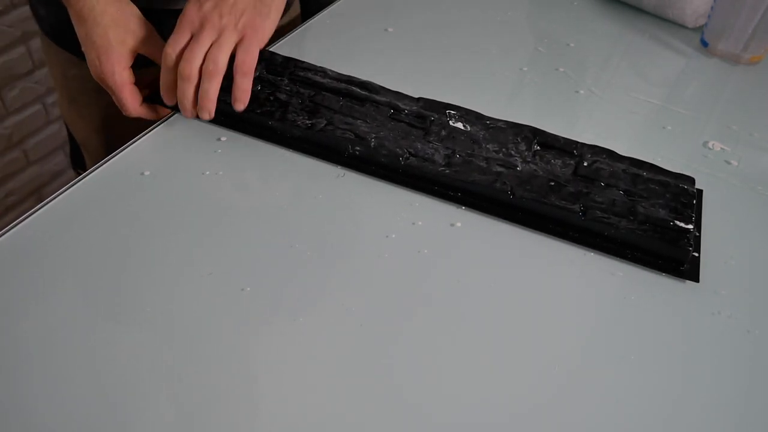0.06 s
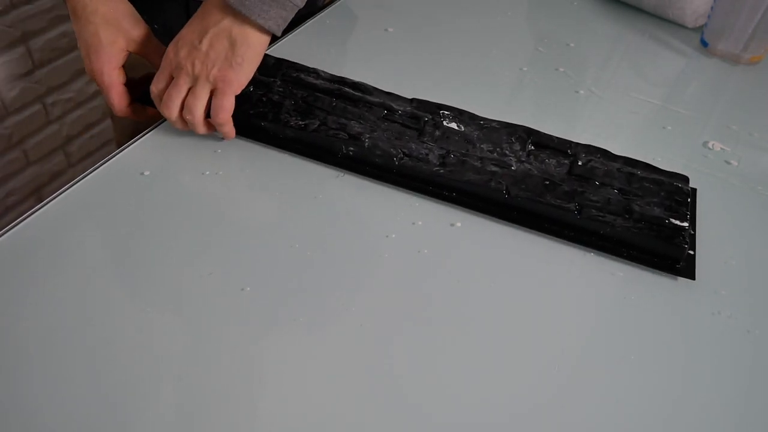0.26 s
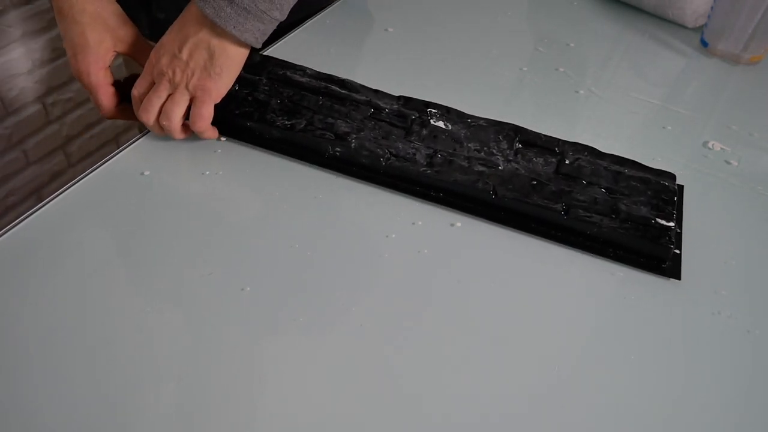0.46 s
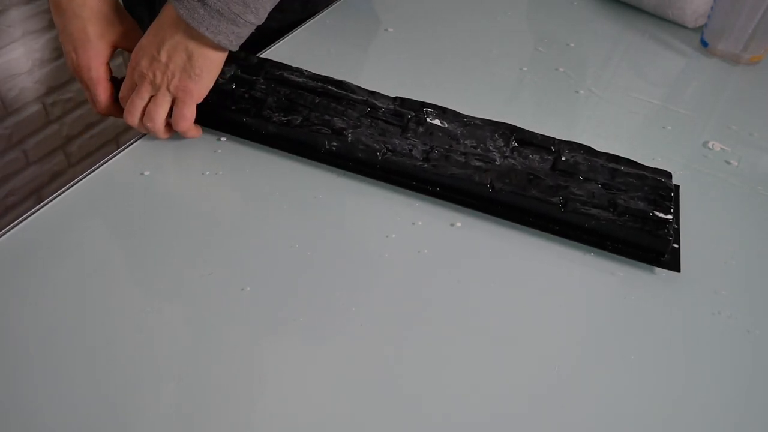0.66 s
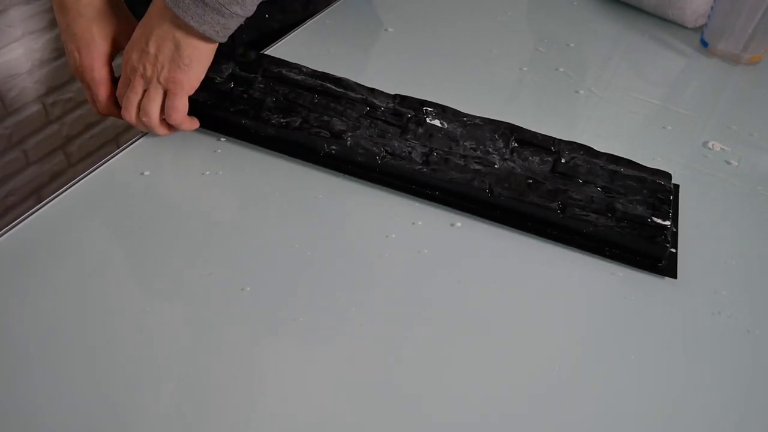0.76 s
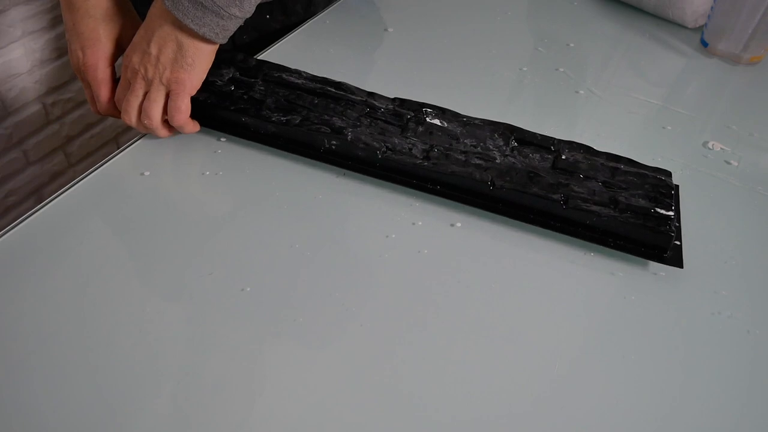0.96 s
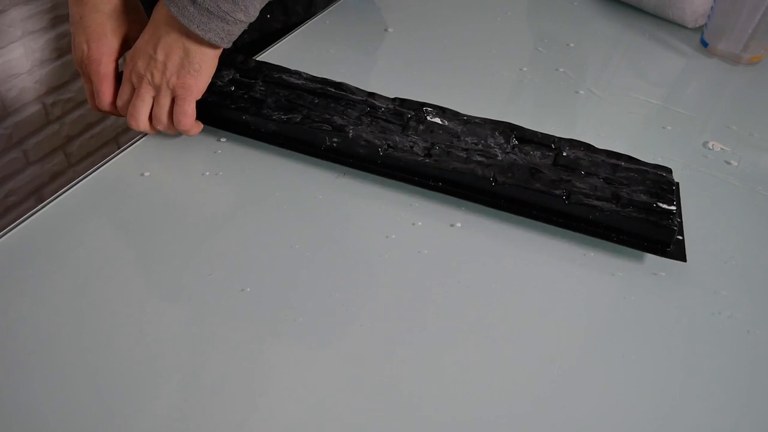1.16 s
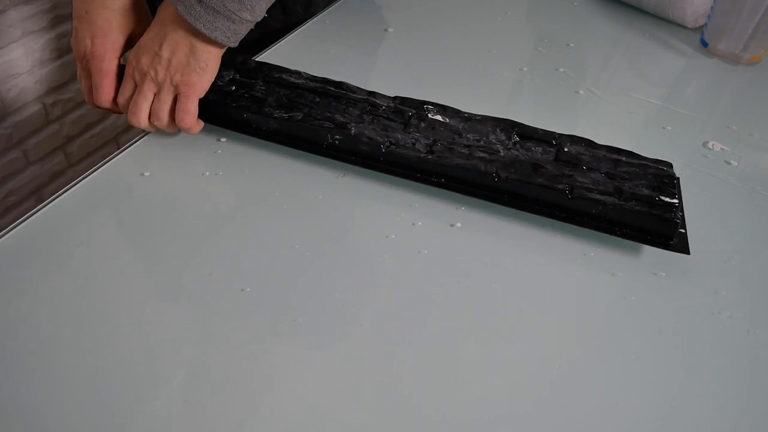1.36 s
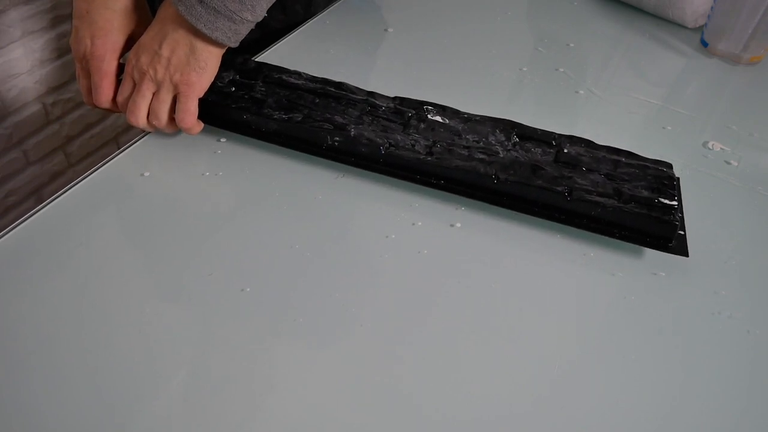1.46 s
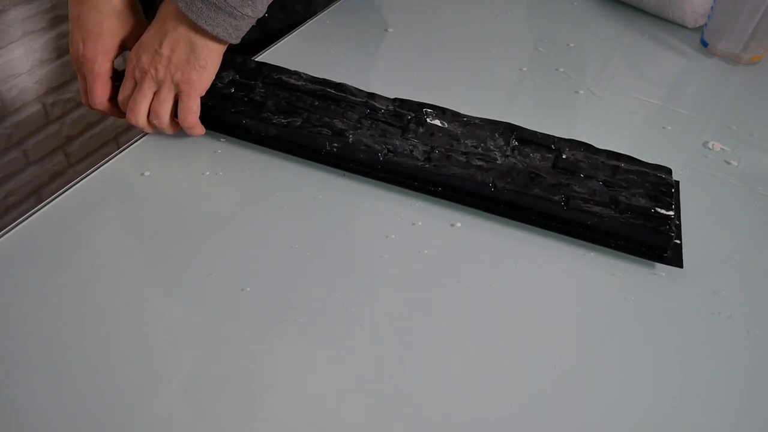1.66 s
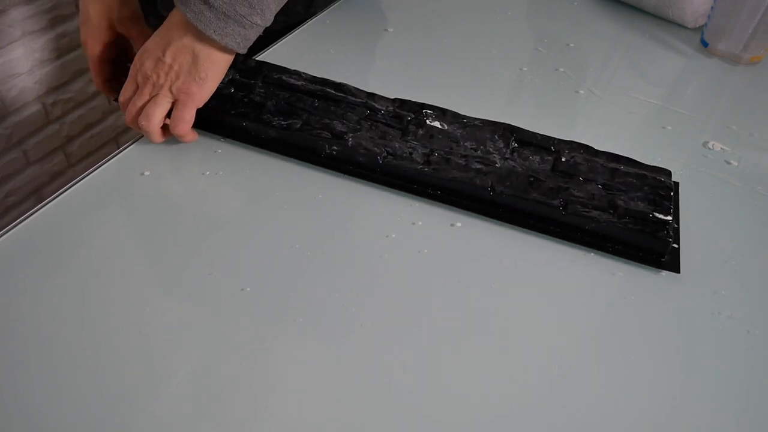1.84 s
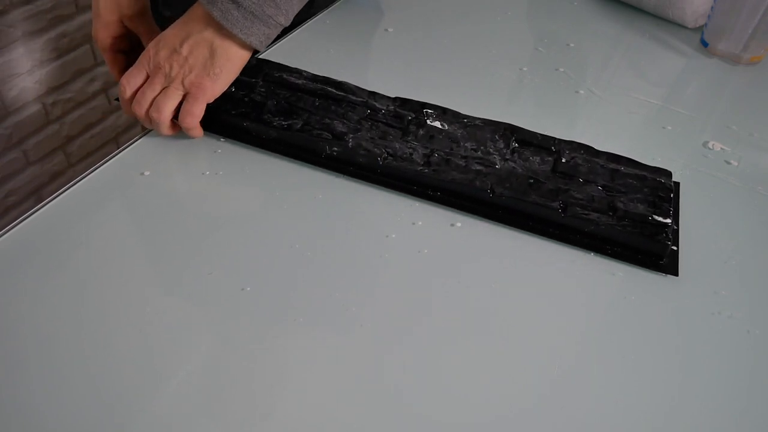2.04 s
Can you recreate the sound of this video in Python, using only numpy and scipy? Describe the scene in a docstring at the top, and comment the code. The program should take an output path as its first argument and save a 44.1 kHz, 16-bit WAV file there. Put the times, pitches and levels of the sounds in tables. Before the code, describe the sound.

Rubber mould bent by hand on a glass tabletop: a hard knock, scraping drags, dull popping thuds

```python
"""Rubber mould bent on a glass table

Hands bend a stiff rubber mould on a glass table in a small room. Fingers rub and swipe its ridged back
(coloured grainy noise); its end knocks (damped sines) and drags (random slips, bright noise) on the table
top, which rings low (decaying modes). Small pops, ticks and squeaks follow as the rubber flexes."""
import sys
import numpy as np
from scipy import signal
from scipy.fft import rfft, irfft, next_fast_len
from scipy.io import wavfile
from scipy.ndimage import uniform_filter1d, map_coordinates

SR = 44100
rng = np.random.default_rng(int(sys.argv[2]) if len(sys.argv) > 2 else 0)


def inscribe(sig):
    """Save sig as 16-bit PCM at rate SR to the path in sys.argv[1].

    A 1-D sig is mono; a 2-D sig holds one channel per row.
    Samples are clipped to [-1, 1] before scaling.
    """
    pcm = np.round(np.clip(np.atleast_2d(sig).T, -1, 1) * 32767)
    wavfile.write(sys.argv[1], SR, pcm.astype(np.int16))


def field_ratio(decibels):
    """Amplitude ratio for a level in dB (20 dB per decade); scalars and array-likes work."""
    return 10 ** (np.asarray(decibels, dtype=float) / 20)


N = 92610


def unit(x):
    """Scaled to rms 1."""
    return x / np.sqrt(np.mean(x ** 2) + 1e-20)


def along(points, hz):
    """(Hz, value) points read on a log frequency axis."""
    point_hz, values = np.transpose(points)
    return np.interp(np.log(hz + 1), np.log(point_hz + 1), values)


def curves(rows):
    """One value per sample for each column; the first, a level in dB, is silenced outside the table."""
    knot_s, level_db, *others = np.transpose(rows)
    t = np.arange(N) / SR
    inside = 1.0 * ((t >= knot_s[0]) & (t <= knot_s[-1]))
    inside = uniform_filter1d(inside, size=200, mode="nearest")
    level = np.interp(t, knot_s, level_db) + 20 * np.log10(np.abs(inside) + 1e-6)
    return [level] + [np.interp(t, knot_s, column) for column in others]


def wobble(rate):
    """A smooth random curve, rate knots a second."""
    knots = rng.standard_normal(int(N * rate / SR) + 4)
    return map_coordinates(knots, [np.arange(N) * rate / SR])


def coloured(x, spectrum):
    """x through a (Hz, dB) colour, at rms 1."""
    m = next_fast_len(N + 8192)
    gain = field_ratio(along(spectrum, np.fft.rfftfreq(m, 1 / SR)))
    return unit(irfft(rfft(x, m) * gain, m)[:N])


def friction(spectrum, grain_db, patchy_db):
    """Noise in grains (level wobbling in time) and in time-frequency patches of random gain, at rms 1."""
    z = signal.stft(rng.standard_normal(N), nperseg=256)[2]
    field = uniform_filter1d(rng.standard_normal(z.shape), size=3, axis=0)
    field = uniform_filter1d(field, size=14, axis=1)
    patchy = signal.istft(z * field_ratio(patchy_db * unit(field)), nperseg=256)[1][:N]
    return coloured(patchy * field_ratio(grain_db * wobble(300)), spectrum)


def add_at(out, start_s, x):
    """Adds x into out from start_s on."""
    out[round(start_s * SR):][:len(x)] += x


def strike_time():
    """Time axis of one short contact, and its rounded onset."""
    t = np.arange(SR // 8) / SR
    attack_s = 0.000577
    return t, (1 - np.exp(-t / attack_s)) ** 2


def rub():
    """Fingers rub the ridges: narrow-band friction noise, its colour shifted in pitch for each rub."""
    # a list per rub: start_s, level_db
    rubs = [
        [(0.0, -48.5), (0.016, -45), (0.23, -46)],
        [(1.1, -66), (1.698, -65.5), (1.77, -55.5)],
        [(1.94, -87.5), (1.97, -64.5), (2.0, -49), (2.1, -44.5)],
    ]
    # pitch_hz, relative_db
    rub_colour = [(180, -40), (439, -44), (1160, -38.5), (1370, -26.5), (2210, -22.5), (4000, -9.5),
                  (4400, 4), (5900, -5.5), (11100, -28), (15500, -33.5)]
    # pitch factor on the colour, one per rub
    rub_shift = (0.9854, 1.03, 1.1124)
    out = np.zeros(N)
    for rows, shift in zip(rubs, rub_shift):
        colour = np.multiply(rub_colour, [shift, 1])
        out += field_ratio(curves(rows)[0]) * friction(colour, grain_db=1.5, patchy_db=2.5)
    return out


def swipe():
    """The palm swipes along the mould: broad-band friction noise."""
    # a list per swipe: start_s, level_db
    swipes = [
        [(0.0, -71), (0.03, -50.5), (0.08, -49), (0.094, -60), (0.19, -54)],
        [(0.19, -62.5), (0.218, -37), (0.296, -35.5), (0.364, -29), (0.448, -41)],
        [(1.75, -62.5), (1.776, -40.5), (1.816, -33), (1.9, -78.5), (1.92, -95)],
    ]
    # pitch_hz, relative_db
    swipe_colour = [(120, -37), (235, -26), (383, -10), (733, -1.5), (1020, -7), (1300, -1.5), (2490, -2),
                    (5060, -1.5), (11200, -18), (15500, -31)]
    level = sum(field_ratio(curves(rows)[0]) for rows in swipes)
    return level * friction(swipe_colour, grain_db=1.2, patchy_db=2.5)


def noise_floor():
    """Faint steady background noise, grainy and patchy."""
    # pitch_hz, relative_db
    floor_colour = [(60, -14), (605, -8.5), (4210, -7), (6090, -15.5), (7500, -9.5), (15000, -13)]
    floor_db = -66
    return field_ratio(floor_db) * friction(floor_colour, grain_db=2.0, patchy_db=4.5)


def table():
    """One ring of the glass top, energy 1: modes at randomly varied levels, with slightly wandering phase."""
    # modes of the glass: pitch_hz, level_db, t60_s
    modes = [(151, -12, 0.38), (280, -8, 0.73), (328, -3, 0.5), (404, -4, 0.3), (538, -1, 0.3),
             (595, -3, 0.3), (484, 0, 0.4), (694, -5, 0.34)]
    t = np.arange(SR // 2) / SR
    ring = np.zeros(len(t))
    for hz, db, t60_s in modes:
        level = field_ratio(db + rng.normal(0, 2) - 60 * t / t60_s)
        phase = 0.5 * wobble(25)[:len(t)] + rng.uniform(0, 2 * np.pi)
        ring += level * np.sin(2 * np.pi * hz * t + phase)
    return ring / np.linalg.norm(ring)


def low_thumps():
    """Low body of the heavier knocks, and a few soft bumps: a short low sine burst that also rings the glass."""
    # start_s, level_db, pitch_hz, length_s
    thump_rows = [(0.209, -41.5, 190, 0.0117), (.235, -37, 278.3, 0.0069), (0.456, -14.5, 297.5, 0.00333),
                  (0.68, -25, 529, 0.0043), (0.818, -24, 352, 0.0042), (1.406, -33, 252, 0.0114),
                  (1.49, -33.5, 229, 0.01934), (1.606, -39.5, 251.6, 0.0151)]
    ring_db = -15.5
    out = np.zeros(N + SR)
    t = np.arange(SR // 8) / SR
    for start_s, db, hz, length_s in thump_rows:
        window = np.sin(np.pi * np.clip(t / length_s, 0, 1)) ** 2
        thump = np.sin(2 * np.pi * hz * t) * window
        add_at(out, start_s, field_ratio(db) * thump)
        add_at(out, start_s, field_ratio(db + ring_db) * signal.fftconvolve(thump, table()))
    return out[:N]


def knocks():
    """Knocks and pops: a round thud of a few cycles with one overtone, and a noisy shudder of the rubber."""
    # start_s, level_db, pitch_hz, overtone_hz, overtone_db; thud and overtone are raised further below
    knock_rows = [(0.457, -12, 543.6, 1598, -3.5), (0.661, -30, 870, 1770, -16),
                  (0.685, -19.5, 596, 1226, -14.5), (0.82, -20.5, 642, 1430, -7.5),
                  (.84, -22, 554, 1330, -25), (1.195, -36.5, 453, 990, -30.5),
                  (1.201, -32, 717.4, 1250, -56.5), (1.214, -36, 578, 1221, -34),
                  (1.2535, -29.5, 850.5, 1460, -3), (1.3565, -33, 718, 1255, -79),
                  (1.402, -19, 689.7, 1116, -6), (1.429, -34, 801, 1520, -25.5),
                  (1.468, -24, 828, 1257, -17.5), (1.492, -15.5, 919, 1220, -16.5),
                  (1.521, -30, 765, 1354, -36.5), (1.556, -22, 1308, 1810, -16),
                  (1.559, -27, 852, 1654, -2.5), (1.589, -29, 787, 1410, -22),
                  (1.606, -21, 818, 1400, -5.5), (1.644, -35.5, 581, 1380, -4),
                  (1.687, -38, 640.6, 1103, -31), (1.701, -29.5, 591.5, 980, -17.5),
                  (1.7165, -29.5, 738.5, 2330, -19.5), (1.752, -31, 598, 889.5, -4.5),
                  (1.811, -34, 897, 1485, 6.5), (1.975, -59, 670, 985, -12.5), (2.009, -51, 580, 985, -20),
                  (2.085, -49, 595, 905, -11)]
    # the shudder's colour: pitch_hz, relative_db
    shudder_colour = [(120, -32.5), (250, -7.5), (600, 7), (1100, -6.5), (2200, -25.5), (4000, -70)]
    thud_cycles, overtone_cycles = 3.752, 4.126  # cycles to fall 20 dB
    shudder_db, shudder_t60_s = -14.5, 0.1
    out = np.zeros(N + SR)
    t, rise = strike_time()

    def damped(hz, cycles):
        """Sine that falls by 20 dB in so many cycles."""
        return np.sin(2 * np.pi * hz * t) * field_ratio(-20 * t * hz / cycles)

    shake = coloured(rng.standard_normal(N), shudder_colour)
    for start_s, db, hz, overtone_hz, overtone_db in knock_rows:
        overtone = field_ratio(overtone_db + 5) * damped(overtone_hz, overtone_cycles)
        blow = rise * (damped(hz, thud_cycles) + overtone)
        shudder = np.roll(shake, -round(start_s * SR))[:len(t)]
        shudder = shudder * rise * field_ratio(shudder_db - 60 * t / shudder_t60_s)
        add_at(out, start_s, field_ratio(db) * (field_ratio(6.5) * blow + shudder))
    return out[:N]


def drag():
    """The mould drags over the glass: uneven slips shake the table, and bright friction comes and goes."""
    # a list per drag: start_s, level_db, treble_over_level_db; the slips lie a little lower, see below
    drags = [
        [(0.4575, -19.5, -4), (0.478, -26.5, -10), (0.5, -29.5, -11.5), (0.552, -39, -6.5), (0.578, -38.5, -32),
         (0.645, -55, -19.5)],
        [(0.645, -45, -42), (0.675, -44, -7.5), (0.683, -27, -12.5), (.726, -31, -24.5), (.734, -35, -50),
         (0.797, -39.5, -47), (0.81, -35.5, -21.5), (0.821, -27.5, -8.5), (.9, -34.5, -21),
         (0.929, -38.5, -28.5), (0.951, -29.5, -6.5), (1.081, -35, -16.5), (1.141, -47.5, -22.5),
         (1.19, -62, 0.5)],
    ]
    # colour of the slips: pitch_hz, relative_db
    low_colour = [(59, -49.5), (100, -14.5), (232, -8.5), (319, -5), (374, -5), (530, -4.5), (989, 0),
                  (3200, -33.5), (4160, -42), (7040, -120)]
    # colour of the treble: pitch_hz, relative_db
    high_colour = [(1180, -25), (2000, 10), (3600, 1.5), (4200, -10.5), (6900, -16.5), (8000, -39),
                   (15500, -41)]
    slips_per_s, slip_spread_db, ring_db = 2500, 1.5, -17
    out = np.zeros(N)
    for rows in drags:
        level_db, treble_db = curves(rows)
        slips = (rng.random(N) < slips_per_s / SR) * rng.standard_normal(N)
        slips = slips * field_ratio(slip_spread_db * wobble(59.89))
        low = coloured(slips, low_colour) * field_ratio(level_db - 1.5)
        ring = field_ratio(ring_db) * signal.fftconvolve(low, table())[:N]
        high = friction(high_colour, grain_db=1.2, patchy_db=4) * field_ratio(level_db + treble_db)
        out += low + ring + high
    return out


def lowest_mode():
    """The heavier blows ring the table's lowest mode; each new row cuts off the ring before it."""
    # start_s, level_db
    ring_rows = [(.458, -47), (0.661, -69), (0.816, -39.5), (.945, -54.5)]
    lowest_hz, lowest_t60_s = 114, 0.8
    t = np.arange(N) / SR
    ends_s = [row[0] for row in ring_rows[1:]] + [N / SR]
    out = np.zeros(N)
    for (start_s, db), end_s in zip(ring_rows, ends_s):
        on = uniform_filter1d(1.0 * ((t > start_s) & (t < end_s)), size=300)
        since_s = t - start_s
        out += on * field_ratio(db - 60 * since_s / lowest_t60_s) * np.sin(2 * np.pi * lowest_hz * since_s)
    return out


def ticks():
    """Small bright ticks and squeaks: decaying narrow-band noise."""
    # start_s, level_db, pitch_hz, t60_s
    tick_rows = [(0.488, -30.5, 6110, 0.0215), (0.488, -31.5, 3560, 0.0234), (0.662, -36.5, 5260, 0.019),
                 (.661, -42.5, 3000, 0.0194), (.955, -40, 5340, 0.091), (.955, -38.5, 4230, 0.072),
                 (.817, -37.5, 9530, 0.0257), (1.466, -46.5, 4970, 0.0202), (1.403, -38, 1816, 0.0274),
                 (1.491, -34.5, 3750, 0.0171), (1.493, -37, 2930, 0.0246), (1.607, -33.5, 2448, 0.0308),
                 (1.721, -47, 2242, 1), (1.722, -47, 4595, 0.052)]
    half_width = 0.069  # share of the pitch, either side
    out = np.zeros(N + SR)
    t, rise = strike_time()
    fade = np.cos(4 * np.pi * t)  # reaches zero at the end of t
    for start_s, db, hz, t60_s in tick_rows:
        edges_hz = [hz * (1 - half_width), hz * (1 + half_width)]
        band = signal.butter(2, edges_hz, "band", fs=SR, output="sos")
        tick = unit(signal.sosfilt(band, rng.standard_normal(len(t))))
        add_at(out, start_s, field_ratio(db - 60 * t / t60_s) * rise * tick * fade)
    return out[:N]


def scuffs():
    """The mould's edge catches the glass anew: sudden bright friction that dies away."""
    # start_s, level_db, t60_s
    scuff_rows = [(0.675, -49.5, 0.091), (0.806, -49.5, 0.094), (0.818, -43, 0.052), (0.935, -50, 0.2325)]
    # pitch_hz, relative_db
    scuff_colour = [(1200, -32.5), (2000, 2), (4500, -7.5), (7000, -12), (15000, -21.5)]
    t = np.arange(N) / SR
    level = sum(field_ratio(db - 60 * np.abs(t - start_s) / t60_s) * (t >= start_s)
                for start_s, db, t60_s in scuff_rows)
    return level * friction(scuff_colour, grain_db=2, patchy_db=1.5)


def room(x):
    """Room reverberation: a noise tail dying by band, drawn anew every tenth of a second."""
    # pitch_hz, t60_s
    decay = [(150, 0.47), (700, 0.1767), (2000, 0.198), (6000, 0.183), (12000, 0.12)]
    delay, step = 150, SR // 10  # samples
    out = np.zeros(N + SR)
    for a in range(0, N, step):
        hz, t, z = signal.stft(rng.standard_normal(SR // 2), SR, nperseg=256)
        fall = field_ratio(-60 * t / along(decay, hz)[:, None])
        tail = signal.istft(z * fall, SR, nperseg=256)[1]
        wet = signal.fftconvolve(x[a:a + step], tail / np.linalg.norm(tail))
        out[a + delay:][:len(wet)] += wet[:len(out) - a - delay]
    return out[:N]


def stereo(mid):
    """Nearly mono: the two channels differ by a faint phase-turned share of the mid."""
    # pitch_hz, side_over_mid_db
    side_share = [(2000, -31.5), (5000, -30), (12000, -22)]
    share = field_ratio(along(side_share, np.fft.rfftfreq(N, 1 / SR)))
    turn = np.exp(2j * wobble(100)[:N // 2 + 1])  # phase wanders along frequency
    side = irfft(rfft(mid) * share * turn, N)
    return np.array([mid + side, mid - side])


def scene():
    """Hands, contacts and drags, each sent to the room at its own level, over the noise floor."""
    hand_wet_db, hit_wet_db, drag_wet_db = -10.5, -7, -7.5
    hand = rub() + swipe()
    background = noise_floor()
    hit = low_thumps() + knocks() + lowest_mode() + ticks()
    pull = drag() + scuffs()
    send = field_ratio(hand_wet_db) * hand + field_ratio(hit_wet_db) * hit + field_ratio(drag_wet_db) * pull
    return stereo(hand + hit + pull + room(send) + background)


def suppress_noise(x):
    """Noise suppressor: turns down every time-frequency bin whose smoothed power is weak."""
    threshold_db, deepest_cut_db = -92, -12
    z = signal.stft(x, nperseg=512, noverlap=384)[2]
    power = uniform_filter1d(np.abs(z.mean(0)) ** 2, size=7, axis=1)
    gain = 1 - field_ratio(threshold_db) ** 2 / (np.abs(power) + 1e-20)
    gain = np.clip(gain, field_ratio(deepest_cut_db), 1)
    return signal.istft(z * gain, nperseg=512, noverlap=384)[1][:, :N]


def roll_off(x):
    """The treble ends steeply here."""
    return signal.sosfilt(signal.butter(12, 15700, fs=SR, output="sos"), x)


def record(dry):
    """Bass cut, then noise suppression."""
    low_cut_hz = 95
    cut = signal.butter(4, low_cut_hz, "high", fs=SR, output="sos")
    mix = suppress_noise(signal.sosfilt(cut, dry))
    return roll_off(mix)


dry = scene()
out = record(dry)
inscribe(out)
```